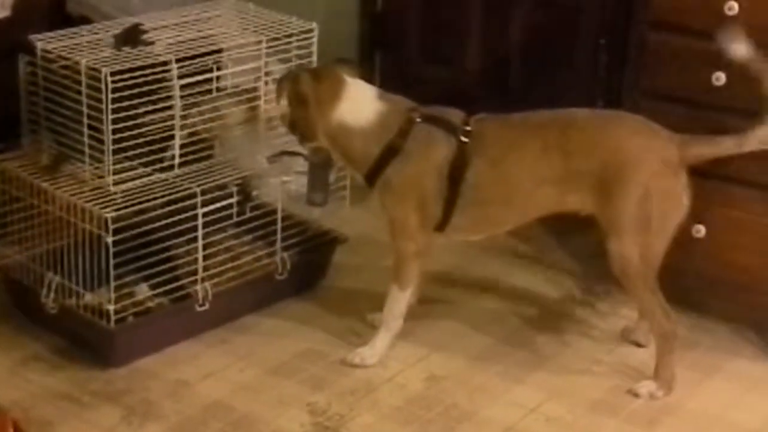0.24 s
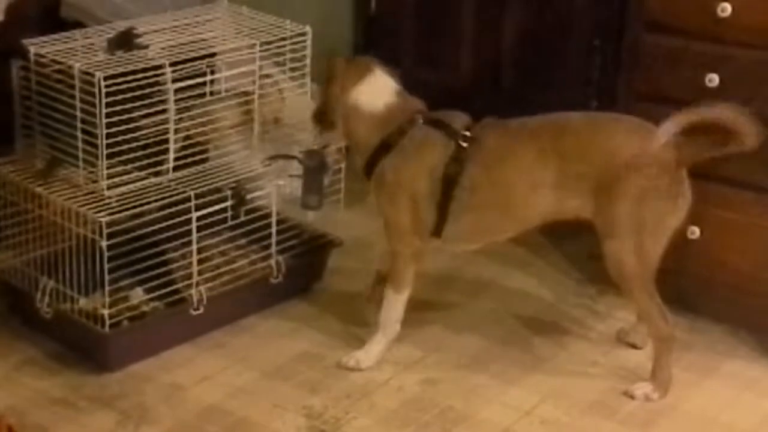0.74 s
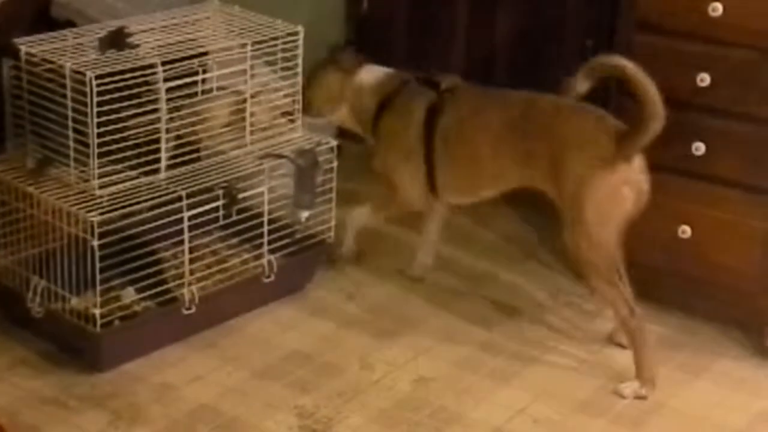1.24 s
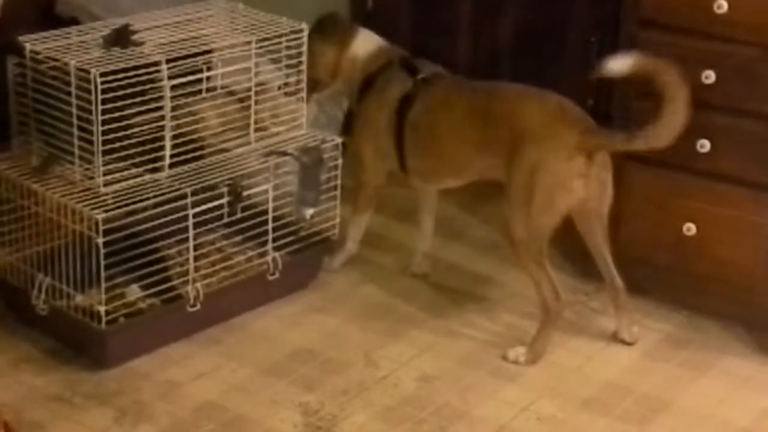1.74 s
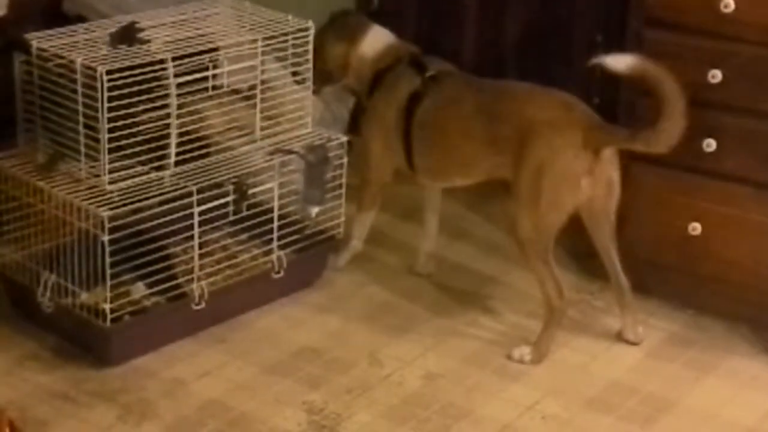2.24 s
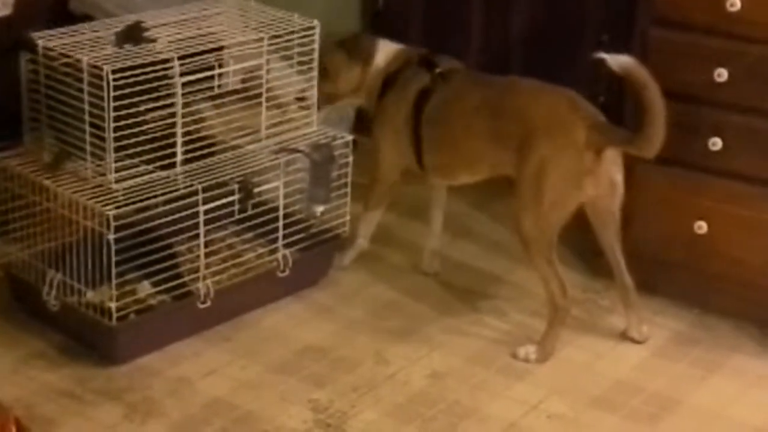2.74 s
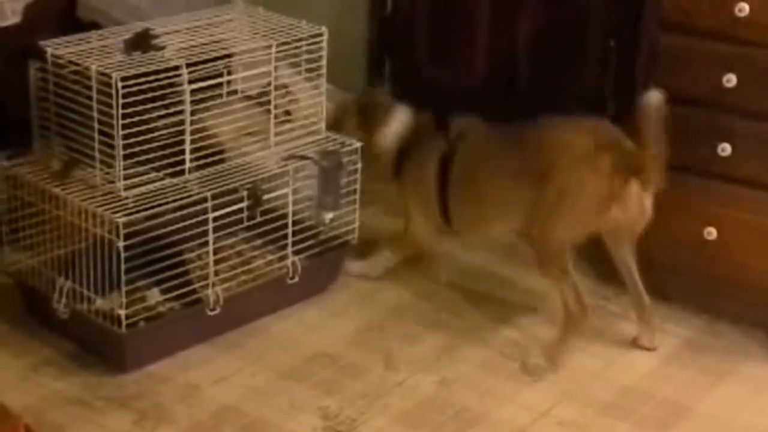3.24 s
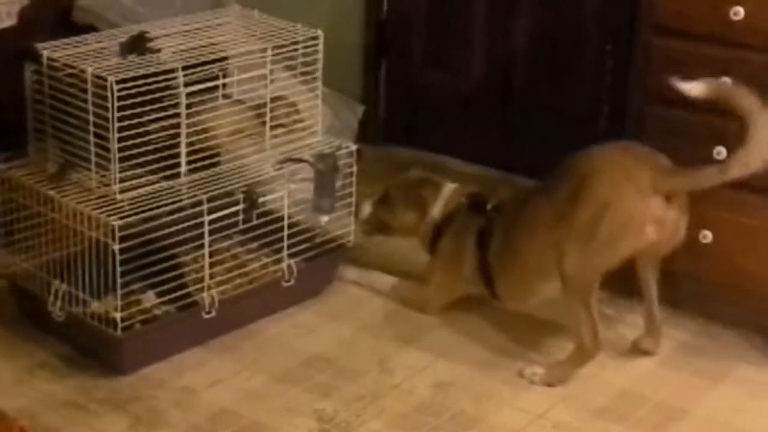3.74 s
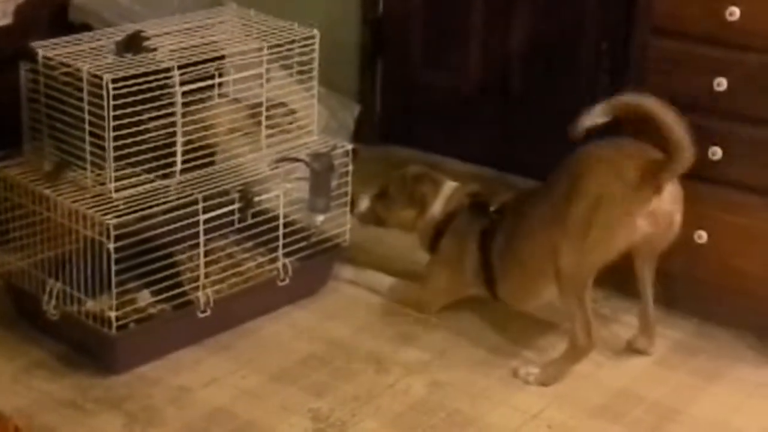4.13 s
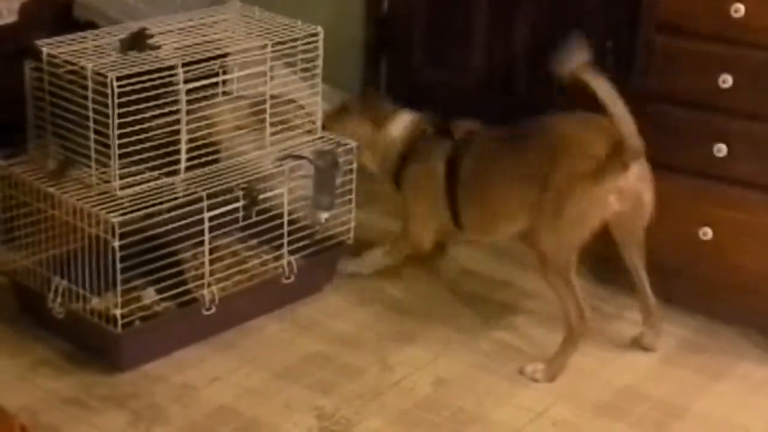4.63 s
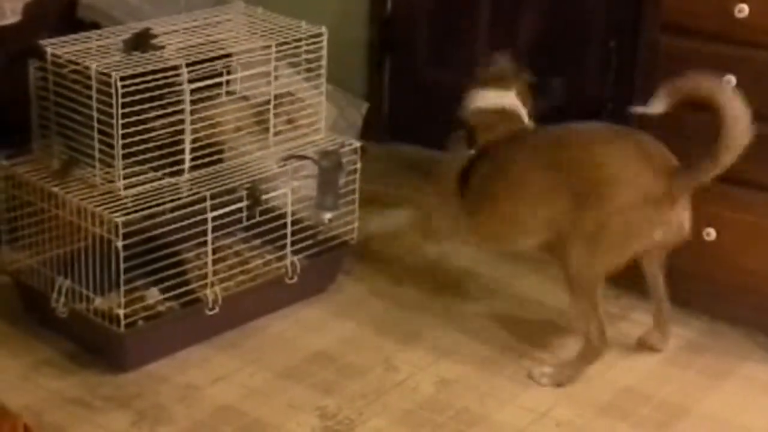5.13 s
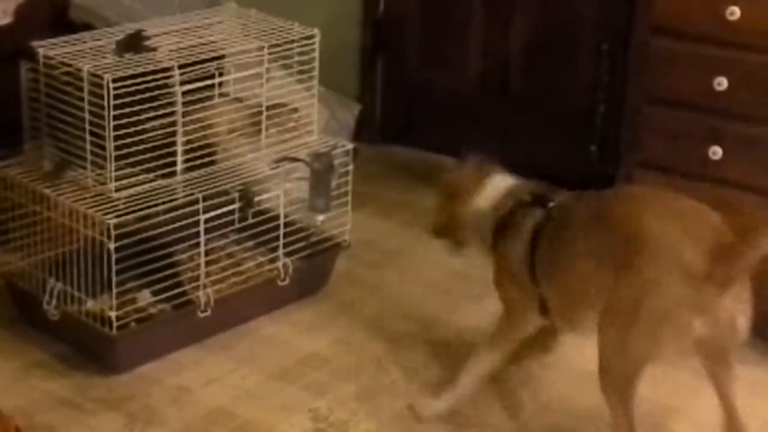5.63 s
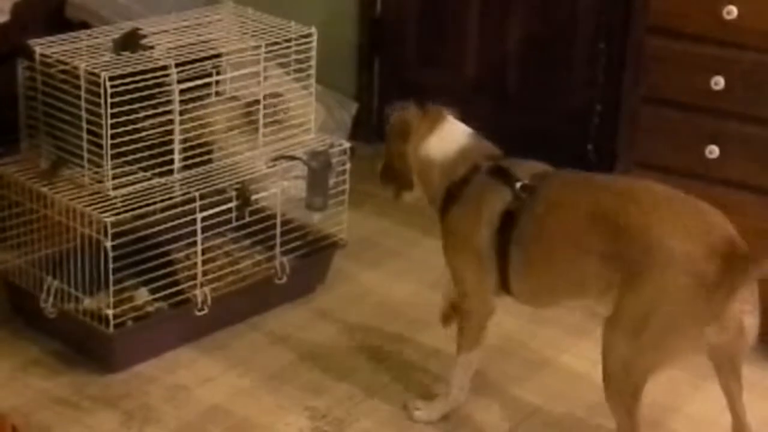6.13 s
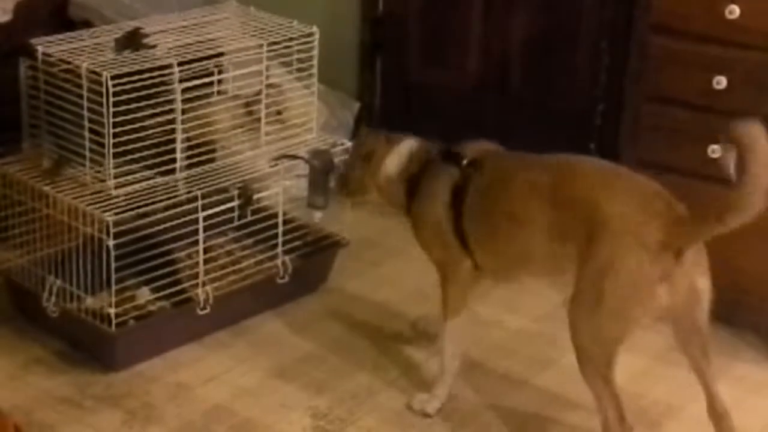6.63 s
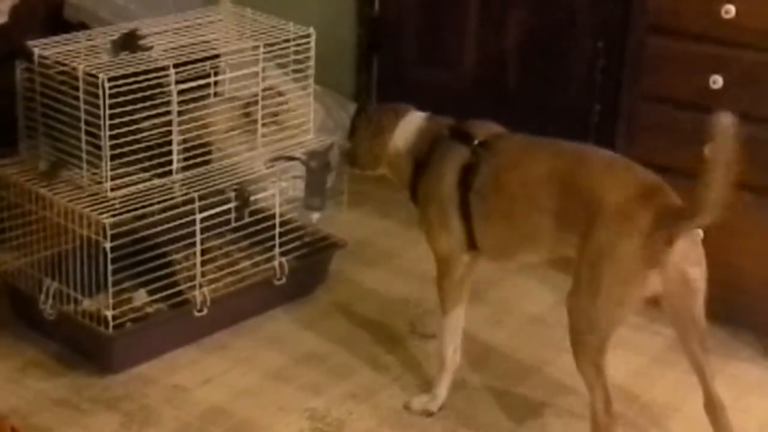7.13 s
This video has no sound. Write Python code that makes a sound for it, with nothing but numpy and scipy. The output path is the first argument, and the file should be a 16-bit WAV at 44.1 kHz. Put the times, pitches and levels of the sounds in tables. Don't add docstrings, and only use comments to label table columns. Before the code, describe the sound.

A dog scrambles around a wire cage on a hard floor, claws clacking sharply, paws thudding and pads scuffing in an echoing room.

```python
import sys
import numpy as np
from scipy import signal
from scipy.fft import rfft, irfft
from scipy.io import wavfile
from scipy.ndimage import map_coordinates

SR = 44100
rng = np.random.default_rng(int(sys.argv[2]) if len(sys.argv) > 2 else 0)


def nominal_scale(level):
    x = np.asarray(level, float) / 20
    return 10 ** x


def generate_wav(sig):
    pcm = np.round(np.clip(np.atleast_2d(sig).T, -1, 1) * 32767).astype(np.int16)
    wavfile.write(sys.argv[1], SR, pcm)


N = 326340

# (frequency [Hz], rms level [dB])
FAN_TONES = [(888, -73), (1028, -88.5), (1184, -76.5)]
# (multiple of 60 Hz, rms level [dB])
MAINS_HARMONICS = [(1, -79), (2, -79.5), (3, -72.5), (4, -74.5), (5, -75.5), (6, -74.5)]
# (frequency [Hz], density [dB per Hz])
AIR_SPECTRUM = [(24, -25), (42, -22), (50, -8), (66, -6.5), (90, -14.5), (107, -9), (180, -11),
                (209, -16.5), (295, -2.5), (326, -15), (351, -8), (833, -11.5), (897, -6.5), (1510, -16.5),
                (14600, -28.5)]
# (frequency [Hz], left minus right [dB])
AIR_BALANCE = [(60, -1.5), (110, 3), (200, 3.5), (380, 5.5), (700, -7.5), (1290, -7), (2380, 0.5),
               (4400, 5.5), (8120, -1.5), (15000, 2.5)]
# (frequency [Hz], left minus right [dB])
ROOM_BALANCE = [(60, 1.5), (200, 1.5), (420, 2.5), (700, -6.5), (1290, -8), (2380, -0.5), (4400, 0.5),
                (6200, -13), (8500, -19.5), (11000, -67.5), (15000, -101)]
# (frequency [Hz], correlation [-1 to 1])
LIKENESS = [(60, 0.91), (150, 0.92), (380, 0.8), (640, 0.15), (1400, 0.39), (3100, -0.11), (15000, 0.087)]
# (frequency [Hz], time to fall 60 dB [s])
DECAY_TIME = [(60, 0.54), (250, 0.34), (1000, 0.43), (2500, 0.33), (6000, 0.33), (13000, 0.28)]
# (full strength at [s], rise [s], hold [s], drag level [dB], low rub over drag [dB])
PAD_STROKES = [(0.357, .05, .02, -75, 3), (0.537, 0.055, 0.026, -64.5, -2),
               (0.993, 0.04, 0.027, -54.5, -7.5), (1.075, .02, .01, -57, -6),
               (1.18, 0.043, 0.1, -50.5, -1.5), (1.632, 0.076, 0.063, -58, 2), (1.816, 0.1, 0.16, -65, -8),
               (2.147, .05, .03, -79, 9.5), (2.755, .04, 0.039, -64, -1.5), (2.997, 0.3, 0.017, -65, 1),
               (3.276, 0.095, 0.19, -62.5, 2.5), (3.502, 0.036, 0.043, -48.5, 0),
               (3.663, 0.079, 0.073, -60, -11), (3.884, 0.038, .05, -69, -2), (4.46, 0.032, 0.018, -78, 12),
               (4.763, 0.11, 0.066, -64, 4), (5.07, 0.19, 0.1, -59, 0.5), (5.26, 0.022, 0.03, -55, 1),
               (5.874, 0.065, 0.047, -51.5, -3), (6.064, .05, 0.021, -65, -5),
               (6.59, 0.095, 0.26, -61, 2.5), (6.893, 0.049, 0.034, -69, 6), (7.1, 0.034, .02, -69.5, 7),
               (7.357, 0.26, .04, -70.5, 4)]
# (full strength at [s], rise [s], hold [s], scratch level [dB], hiss over scratch [dB])
CLAW_STROKES = [(.482, .02, .01, -78, 9), (.65, 0.073, 0.046, -71.5, -1), (0.989, 0.033, 0.027, -56.5, -2),
                (1.08, 0.025, .01, -58, -3), (1.208, 0.049, 0.03, -45.5, 1.5), (1.298, .04, .01, -57, -15),
                (1.427, 0.017, .01, -54.5, 2.5), (1.81, 0.071, 0.054, -72, -2), (2.238, .05, .01, -74.5, 3),
                (2.805, .02, .02, -76, 8.5), (2.92, .06, 0.11, -70, 2), (3.252, 0.057, 0.12, -62.5, 6.5),
                (3.468, 0.046, 0.034, -43, 4), (3.589, 0.081, .1, -59, 2), (4.505, 0.049, .1, -66, -4),
                (4.762, 0.074, 0.13, -68, 6), (5.08, 0.13, .07, -58, 6.5), (5.308, .04, 0.011, -64.5, 7.5),
                (5.849, 0.044, 0.063, -51.5, -4), (6.595, 0.045, .15, -62.5, 4),
                (6.945, 0.022, 0.061, -67.5, 1), (7.15, .03, 0.033, -66.5, -3.5),
                (7.38, 0.063, .02, -70.5, 4.5)]
# (time [s], peak level [dB], pitch [Hz])
TOE_TAPS = [
    (.4665, -45.5, 300),
    (.868, -55, 400),
    (1.086, -36, 704),
    (1.095, -35.5, 532),
    (1.265, -46, 780),
    (3.3865, -17.5, 310),
    (3.5435, -16.5, 280),
    (6.451, -40, 744),
]
# (full strength at [s], rise [s], hold [s], creak level [dB], cover rustle over creak [dB])
CAGE_NUDGES = [
    (.975, 0.028, 0.032, -51, -27),
    (2.98, .01, .03, -86, 18),
    (4.5, .02, .08, -74, -10),
    (4.77, .05, .13, -84, 21),
    (4.96, .02, .04, -85, 21),
    (5.55, .02, .05, -72, 20),
]
# (frequency [Hz], width [Hz], level [dB])
FRAME_MODES = [(1150, 160, -4), (1320, 150, -1), (2200, 90, -3), (2690, 90, -1), (3360, 150, -12),
               (5950, 200, -12), (6700, 220, -8)]
# (time [s], peak level [dB], board pitch [Hz], deep boom level [dB])
LANDINGS = [(1.083, -31, 324, -17), (1.101, -36, 180, -8), (1.186, -61, 252, -6), (1.431, -38, 226, -29),
            (1.457, -44, 320, -24), (3.265, -56, 375, -13), (3.383, -22, 309, -16.5),
            (3.424, -26, 166, -18), (3.473, -33, 302, -20), (3.533, -30.5, 260, -11),
            (3.545, -23, 324, -17), (3.571, -25.5, 161, -22), (3.637, -47, 163, -16),
            (4.978, -50.5, 450, -37), (5.13, -44.5, 217, -19.5), (5.254, -51, 462, -22.5),
            (5.318, -17, 265, -48), (5.332, -20.5, 435, -42), (5.344, -16.5, 313, -33),
            (5.415, -31.5, 433, -26), (5.521, -27.5, 284, -28), (5.54, -25, 246, -46),
            (5.707, -27, 252, -40), (5.768, -39, 178, -16), (5.878, -50, 191, -18), (6.446, -41, 317, -8),
            (6.465, -43, 433, -1), (6.496, -46.5, 298, 8)]
# (frequency [Hz], density [dB per Hz])
BOARD_SPECTRUM = [(60, -47), (100, -22.5), (150, -4), (300, -5), (455, -4), (520, -8), (640, -15.5),
                  (900, -34), (1500, -60)]
# (time [s], peak level [dB], wire ring level [dB], ring pitch [Hz], sharpness [dB])
CLACK_HITS = [(1.085, -37, -17, 2300, -24), (1.0966, -19, -15.5, 2520, -14.5), (1.4386, -19, -7, 2525, -15),
              (1.6167, -27, -19, 2840, -16), (1.622, -36, -6, 2770, -17), (2.762, -58, -2, 2020, -24),
              (2.971, -50.5, -21, 2220, -11), (3.231, -45, -20, 2350, -16),
              (3.382, -13.5, -8.5, 2140, -15.5), (5.1418, -33.5, -8.5, 2480, -14.5),
              (5.26, -47, -1, 2370, -23), (5.3166, -13.5, -12.5, 2600, -22.5),
              (5.3204, -10.5, -7.5, 2580, -14), (5.411, -16.5, -16, 2630, -15.5),
              (5.5231, -22, -21, 2650, -14.5), (5.532, -14, -11.5, 2620, -15.5),
              (5.703, -14.5, -8, 2580, -16.5), (6.4445, -35, -9, 2550, -22),
              (6.4526, -17.5, -11, 2660, -15), (6.728, -43, -20, 2244, -16)]
# (frequency [Hz], density [dB per Hz])
CLATTER_SPECTRUM = [(350, -20), (600, -11), (878, -9.5), (1230, -7), (1660, -5), (1810, -3), (2280, -1.5),
                    (3870, -2.5), (8290, -0.5), (10200, -6), (14100, -12.5), (14900, -17), (15500, -77)]
BAR_PITCHES = [1270, 2020, 2200, 3480, 3920, 4970, 5640, 6080, 6750, 7750, 8050, 8810, 11200, 12800]
# (time [s], peak level [dB])
BUCKLE_TINKLES = [
    (6.675, -51),
    (6.728, -48),
]
# (frequency [Hz], width [Hz], level [dB])
BUCKLE_MODES = [(6020, 120, -1), (7700, 200, 0), (10600, 300, -8), (12200, 1300, -5), (12800, 200, -4)]


def along(points, hz):
    f, v = np.transpose(points)
    return np.interp(np.log(hz + 1), np.log(f + 1), v)


def bump(hz, centre_hz, width_hz):
    return hz * width_hz / np.hypot(centre_hz ** 2 - hz ** 2, hz * width_hz)


def peaks(modes):
    return lambda hz: sum(nominal_scale(db) * bump(hz, centre, width) ** 2 for centre, width, db in modes)


def wobble(rate):
    knots = rng.standard_normal(int(N * rate / SR) + 4)
    return map_coordinates(knots, [np.arange(N) * rate / SR])


def rush(size, gain):
    hz = np.fft.rfftfreq(size, 1 / SR)
    turn = np.arccos(np.clip(along(LIKENESS, hz), -1, 1)) / 2
    noise = rfft(rng.standard_normal((2, size))) * gain(hz)
    mid, side = noise * [np.cos(turn), np.sin(turn)]
    pair = irfft(np.array([mid + side, mid - side]), size)
    return pair / np.std(pair)


def through(balance, pair):
    hz = np.fft.rfftfreq(N, 1 / SR)
    low_hz, top_hz = 40, 14630
    lean = nominal_scale(along(balance, hz) / 2)
    share = np.array([lean, 1 / lean]) * np.sqrt(2) / np.hypot(lean, 1 / lean)
    band = hz ** 3 / (hz ** 3 + low_hz ** 3) / (1 + (hz / top_hz) ** 60)
    return irfft(rfft(pair) * share * band, N)


def echoes(gain, build_s, spiky_db):
    t = np.arange(32768) / SR
    hz, frame_s, z = signal.stft(rush(len(t), gain), SR, nperseg=256)
    decay = nominal_scale(-60 * frame_s / along(DECAY_TIME, hz)[:, None])
    tail = signal.istft(z * decay, SR, nperseg=256)[1][:, :len(t)]
    knots = np.repeat(rng.standard_normal(len(t) // 32), 32)
    spikes = nominal_scale(spiky_db * knots * np.exp(-t / 0.0084))
    return tail * (1 - np.exp(-t / max(build_s, .001))) * spikes


def add(mix, s, sound):
    part = mix[:, round(s * SR):][:, :sound.shape[1]]
    part += sound[:, :part.shape[1]]


def strokes(rows):
    s, rise, hold, db, over_db = np.transpose(rows)[..., None]
    rise_db, fade_db_per_s = 15.5, 173.5
    t = np.arange(0, N / SR + .01, .001)
    climb = np.clip((s - t) / np.maximum(rise, .005), 0, None)
    fade = np.clip(t - s - hold, 0, None)
    shape_db = db - rise_db * climb ** 2 - fade_db_per_s * fade
    return [np.interp(np.arange(N) / SR, t, np.linalg.norm(nominal_scale(d), axis=0))
            for d in (shape_db, shape_db + over_db)]


def air():
    t = np.arange(N) / SR
    buzz, whine = np.zeros(N), np.zeros(N)
    for k, db in MAINS_HARMONICS:
        buzz += nominal_scale(db + 2.5 + 1.4 * wobble(7.3)) * np.sin(2 * np.pi * (59.9 * k * t + rng.random()))
    for hz, db in FAN_TONES:
        whine += nominal_scale(db + 2 + 2.6 * wobble(22)) * np.sin(2 * np.pi * hz * t + 1.3 * wobble(13))
    hiss = through(AIR_BALANCE, rush(N, lambda hz: nominal_scale(along(AIR_SPECTRUM, hz))))
    bed = nominal_scale(-58 + 0.38 * wobble(1.1)) * hiss
    return bed + buzz * nominal_scale([[.8], [-.8]]) + whine * nominal_scale([[-3], [2.5]])


def shuffle():
    def hiss_gain(hz):
        return nominal_scale(along(CLATTER_SPECTRUM, hz)) * (hz ** 2 / (hz ** 2 + 4500 ** 2) + 0.84 * bump(hz, 7420, 770))

    scratch = rush(N, lambda hz: bump(hz, 2390, 1800) ** 2)
    hiss = rush(N, hiss_gain)
    drag = rush(N, lambda hz: bump(hz, 1045, 940) ** 2)
    rub = rush(N, lambda hz: nominal_scale(along(BOARD_SPECTRUM, hz)))
    mix = np.zeros((2, N))
    for loudness, layer in zip(strokes(CLAW_STROKES) + strokes(PAD_STROKES), (scratch, hiss, drag, rub)):
        mix += loudness * nominal_scale(1.34 * wobble(40)) * layer
    return nominal_scale(1.5 + 0.97 * wobble(90)) * mix


def toe_taps():
    mix, t = np.zeros((2, N)), np.arange(2048) / SR
    for s, db, hz in TOE_TAPS:
        knock = nominal_scale(db - 60 * t * hz / 13) * np.sin(2 * np.pi * hz * t)
        add(mix, s, np.array([-knock, -knock]))
    return mix


def cage_nudges():
    creak, rustle = strokes(CAGE_NUDGES)
    frame = rush(N, peaks(FRAME_MODES))
    cover = rush(N, lambda hz: bump(hz, 11200, 6000) ** 2)
    return creak * frame + rustle * cover


def thuds():
    mix, t = np.zeros((2, N)), np.arange(SR // 2) / SR
    for s, db, board_hz, boom_db in LANDINGS:
        swing_s = 1.28 / board_hz

        def colour(hz):
            drum = nominal_scale(along(BOARD_SPECTRUM, hz)) * (0.15 + bump(hz, board_hz, 112))
            joists = nominal_scale(boom_db + 11) * bump(hz, 70, 68) ** 3
            return drum + joists

        add(mix, s, nominal_scale(db - 5.5) * echoes(colour, swing_s, spiky_db=1.5))
        swell = (1 - np.exp(-t / max(swing_s, .001))) ** 2
        tone = np.sin(2 * np.pi * board_hz * t) * nominal_scale(-60 * t / 0.11) * swell
        add(mix, s, nominal_scale(db + 4.5) * np.array([tone, tone]))
    return mix


def clacks():
    mix, t = np.zeros((2, N)), np.arange(1024) / SR
    wall_s, rattle_s = .0155, 0.0051
    for s, db, ring_db, ring_hz, sharp_db in CLACK_HITS:
        struck = rng.exponential(size=len(BAR_PITCHES))

        def colour(hz):
            answer = sum(g * bump(hz, bar_hz, 0.0306 * bar_hz) ** 2 for g, bar_hz in zip(struck, BAR_PITCHES))
            tilt = nominal_scale((sharp_db + 17.5) * np.clip(np.log2(hz / 6000 + 1e-9), -1, 2))
            wire = nominal_scale(ring_db + 6.5) * bump(hz, ring_hz, 510) ** 2
            return nominal_scale(along(CLATTER_SPECTRUM, hz)) * tilt * (1 + 0.33 * answer) + wire

        add(mix, s, nominal_scale(db - 4.5) * echoes(colour, rattle_s, spiky_db=5.5))
        snap = rush(len(t), colour) * nominal_scale(-60 * t / 0.01)
        ring = np.sin(2 * np.pi * ring_hz * t) * nominal_scale(-60 * t / 0.017) * (1 - np.exp(-t / 0.0009))
        add(mix, s, nominal_scale(db - 6) * snap + nominal_scale(db + ring_db + 10.5) * ring)
        add(mix, s + wall_s, nominal_scale(db) * snap)
    return mix


def buckle():
    mix = np.zeros((2, N))
    for s, db in BUCKLE_TINKLES:
        add(mix, s, nominal_scale(db) * echoes(peaks(BUCKLE_MODES), .008, spiky_db=4))
    return mix


def scene():
    dog_and_cage = shuffle() + toe_taps() + cage_nudges() + thuds() + clacks() + buckle()
    return air() + through(ROOM_BALANCE, dog_and_cage)


def roll_off(x):
    return signal.sosfilt(signal.butter(12, 15820, fs=SR, output="sos"), x)


def record(dry):
    return roll_off(dry)


dry = scene()
out = record(dry)
generate_wav(out)
```